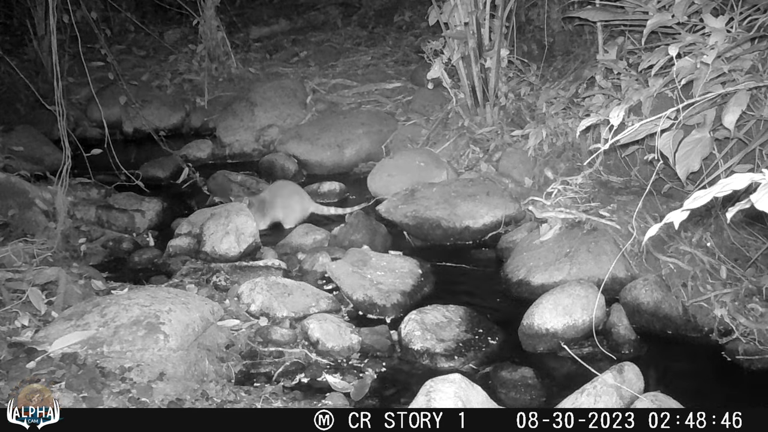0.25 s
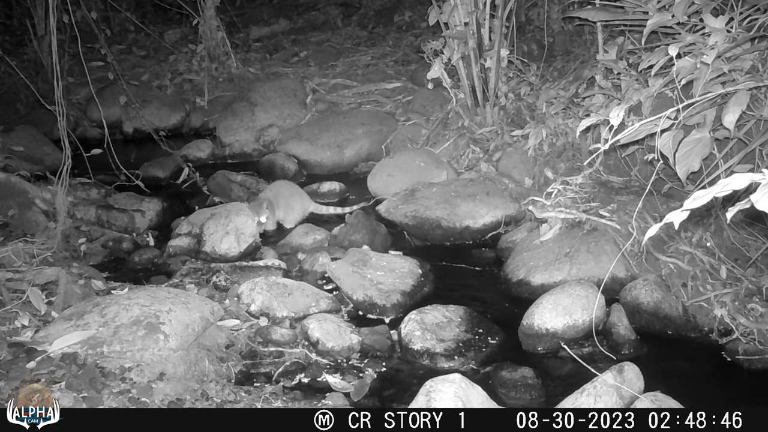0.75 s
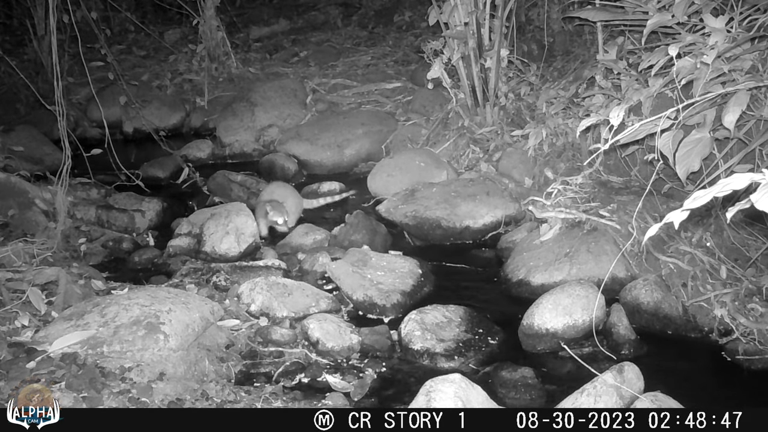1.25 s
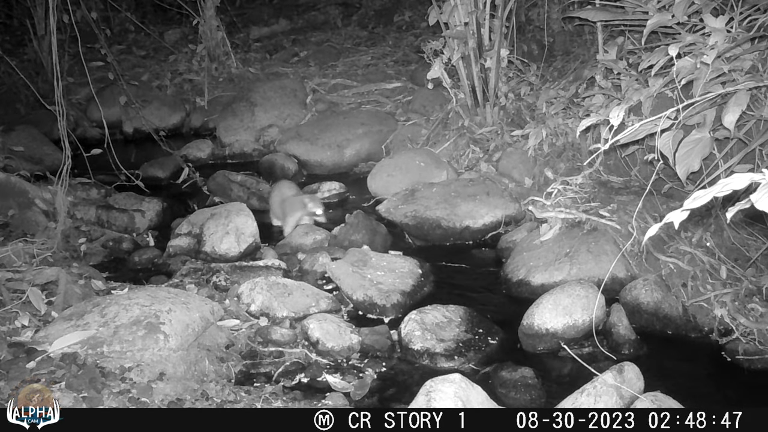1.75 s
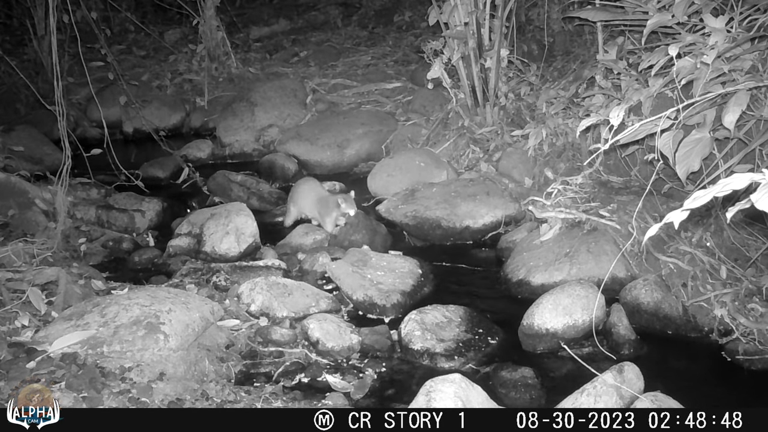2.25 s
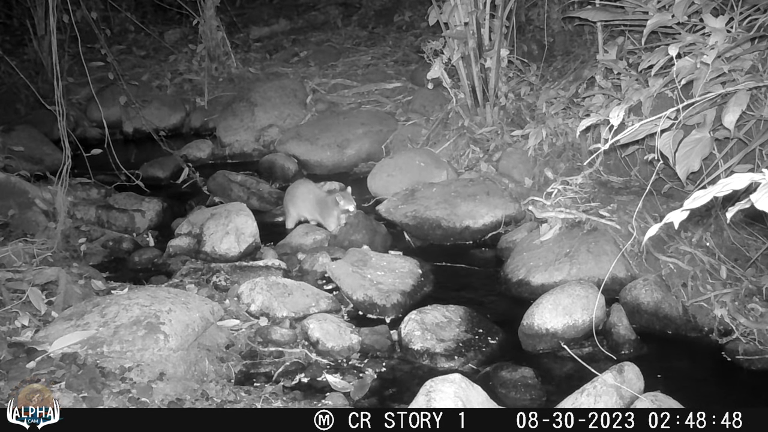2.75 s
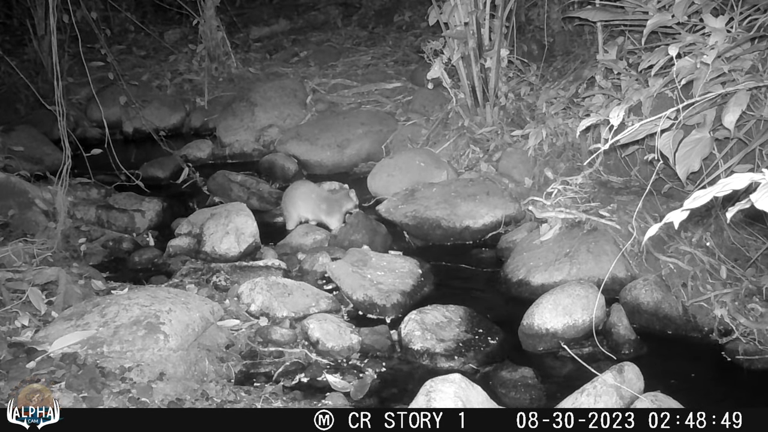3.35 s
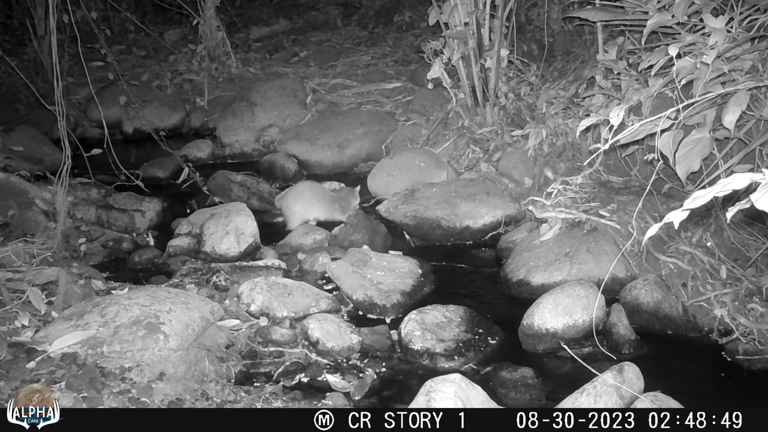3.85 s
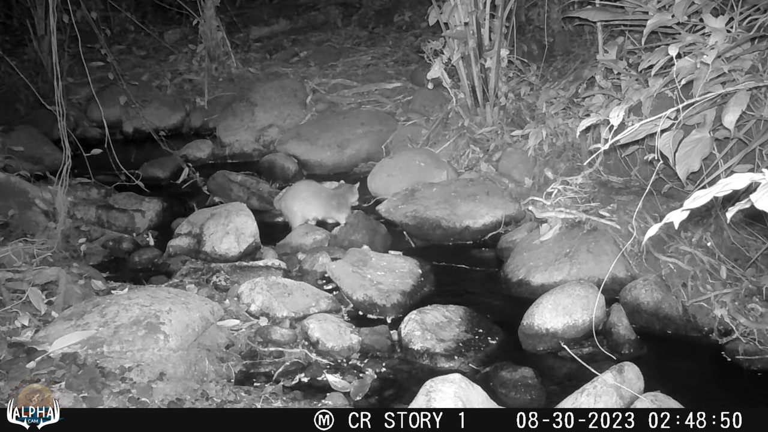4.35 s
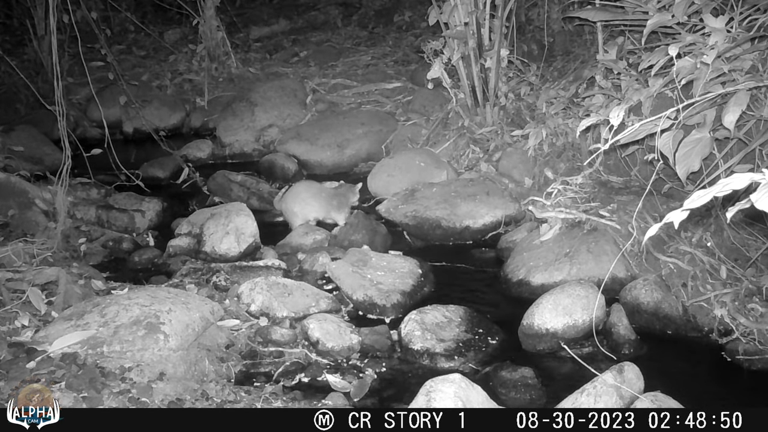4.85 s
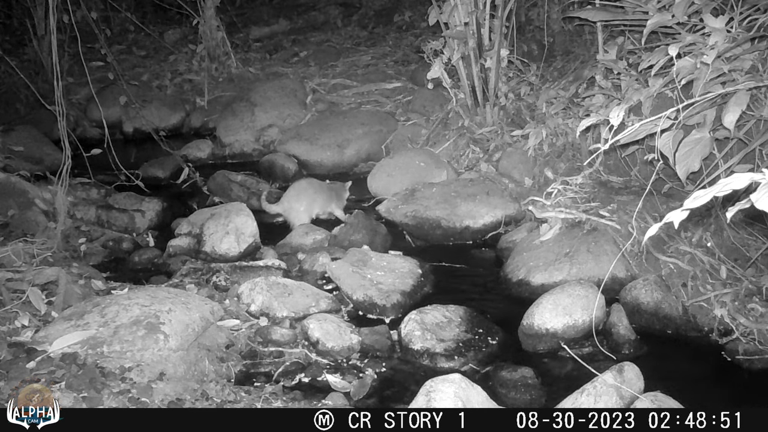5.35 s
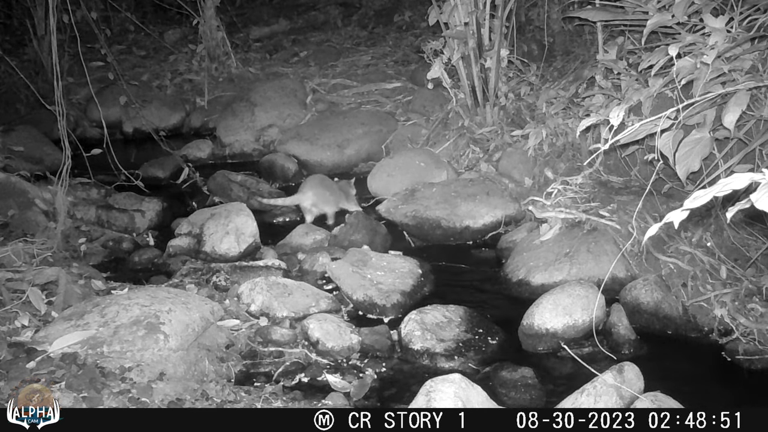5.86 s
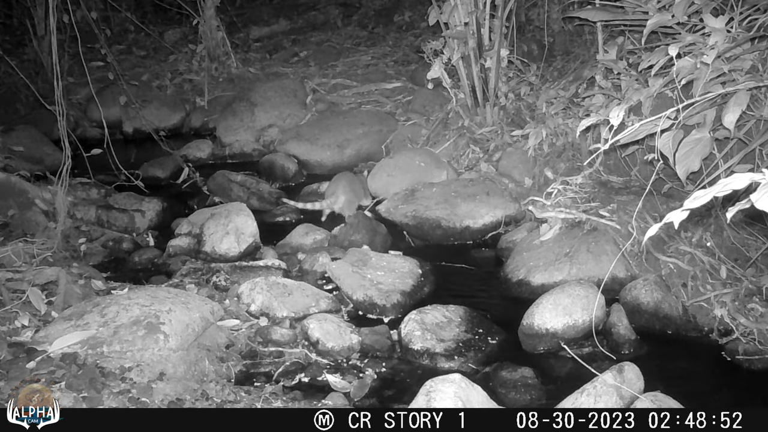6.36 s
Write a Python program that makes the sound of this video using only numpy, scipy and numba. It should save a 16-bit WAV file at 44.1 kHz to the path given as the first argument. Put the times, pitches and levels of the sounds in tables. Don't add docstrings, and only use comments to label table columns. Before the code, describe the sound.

Outdoors by a night brook, a small cheap camera microphone catches quiet trickling water, faint hum and hiss. The sound mutes almost at once, then climbs back in a rapid regular series of low thumps over about one second. Water then runs on unevenly, with isolated drips and rounded bubble plops, while katydids rasp in a high thin drone and crickets trill and buzz in short faint calls.

```python
import sys
import numpy as np
from scipy import signal
from scipy.fft import rfft, irfft
from scipy.io import wavfile
from scipy.ndimage import uniform_filter1d
from numba import njit

SR = 44100
rng = np.random.default_rng(int(sys.argv[2]) if len(sys.argv) > 2 else 0)


def voltage_ratio(level):
    return 10 ** (np.asarray(level, float) / 20)


def materialize(psi):
    bounded = np.clip(np.atleast_2d(psi).T, -1, 1)
    quanta = np.round(bounded * 32767).astype(np.int16)
    wavfile.write(sys.argv[1], SR, quanta)


N = 291501

# t/s, level/dB
SURGES = [(0.0, 1.5), (0.259, 2.5), (1.22, 6), (1.439, 5), (1.56, 1.5), (1.84, 3.5), (2.45, 0), (3.08, 1.5),
          (3.19, 3.5), (4.29, -0.5), (5.05, 2), (5.2, 1), (5.36, 0), (6.29, 0.5), (6.4, 1.5), (6.55, -0.5)]
# f/Hz, level/dB
HOLLOWS = [(450, -6), (1100, -2.5), (1500, -0.5), (2100, -2.5), (2800, -3.5)]
# f/Hz, density/dB per Hz
WASH_SPECTRUM = [(100, -28.5), (170, -2), (399, -12), (469, -1), (759, -2), (1590, -1.5), (2800, -7.5),
                 (3980, -18), (4910, -20.5), (5240, -28), (6780, -16), (7340, -15), (7960, -21.5),
                 (10300, -39), (17500, -120)]
# multiple/1, level/dB rms
HUM_LINES = [(1, -63), (3, -75), (4, -75), (5, -74), (6, -61), (8, -82), (9, -76), (11, -84), (12, -71),
             (15, -79), (16, -84), (21, -86), (24, -74), (27, -82), (30, -78), (33, -86), (36, -86),
             (42, -80), (48, -86), (51, -84), (54, -84), (60, -82), (72, -83)]
# f/Hz, width/Hz, level/dB
CHORUS_MODES = [(6740, 150, -2), (6820, 300, -2)]
# f/Hz, width/Hz, level/dB
DRONE_MODES = [(6456, 1000, -79), (7690, 490, -86)]
# t/s, length/s, level/dB
SOLOS = [(0.01, 0.042, -81.5), (.22, 0.12, -78.5), (1.862, 0.06, -81), (2.28, 0.055, -88),
         (2.45, 0.057, -83), (3.036, 0.068, -82), (4.13, 0.09, -78), (4.496, 0.21, -86),
         (5.006, 0.038, -88), (5.166, 0.065, -80.5), (5.427, 0.027, -85), (5.6, 0.087, -82),
         (5.773, 0.033, -83), (6.488, .14, -78)]
# t/s, length/s, level/dB
TRILLS = [(0.205, 0.081, -84.5), (1.49, 0.11, -80), (2.245, .09, -83), (2.373, 0.18, -82), (3.03, .08, -81),
          (3.17, .08, -94), (3.754, 0.21, -83.5), (4.64, .08, -83), (5.5, 0.099, -84), (5.67, .06, -90),
          (6.313, 0.085, -80), (6.46, 0.058, -86)]
# t/s, level/dB
BUZZES = [(.22, -85), (1.33, -87), (1.56, -87), (1.94, -84), (2.39, -82.5), (2.82, -88.5), (3.18, -83),
          (3.55, -87.5), (3.93, -84), (4.36, -92), (4.82, -89), (5.13, -87), (5.56, -88), (5.92, -91),
          (6.26, -85)]
# f/Hz, level/dB
BUZZ_LINES = [(4215, -5), (4385, -6), (4609, 0), (4787, -1), (4815, -1), (4996, -7)]
# f/Hz, width/Hz, level/dB
FAR_MODES = [(4943, 6, -100), (6368, 24, -90), (7694, 45, -93)]
# t/s, peak level/dB, f/Hz
DRIPS = [(0.248, -58, 1800), (1.871, -62, 2721), (2.657, -61, 2870), (2.744, -61, 1060), (2.999, -60, 2700),
         (3.0072, -55, 2153), (3.004, -69, 3120), (3.4419, -62.5, 3060), (3.1848, -59, 2210),
         (3.1985, -59, 3050), (3.198, -59, 1530), (3.493, -63, 1570), (3.554, -57, 1560),
         (4.037, -61, 2710), (4.408, -55, 2390), (4.4072, -50.5, 2970), (4.5, -55, 2800),
         (4.6636, -59, 2080), (4.699, -61, 1090), (4.851, -61.5, 2920), (5.223, -64, 2630),
         (5.6132, -66, 3350), (5.716, -58, 1920), (5.7432, -53.5, 1015), (5.925, -60, 2360),
         (6.297, -62, 950), (6.4023, -57.5, 2340), (6.4062, -59.5, 800), (6.528, -62, 2190)]
# t/s, peak level/dB, f/Hz, length/ms
PLOPS = [(1.6095, -58.5, 1640, 9.3), (1.7153, -58.5, 1620, 6.5), (1.8085, -58.5, 600, 14.3),
         (1.8511, -60, 810, 9.2), (1.893, -55.5, 1140, 7.2), (2.3428, -56, 1540, 7),
         (2.4847, -54, 546, 5.2), (2.5056, -60.5, 940, 11), (2.8797, -59.5, 1590, 6.4),
         (3.202, -64, 1110, 10.3), (3.354, -62, 1363, 13), (3.8054, -66, 630, 15), (4.1348, -58.5, 532, 12),
         (4.3006, -60, 422, 29), (4.303, -58, 1520, 3.9), (4.312, -60.5, 1157, 12),
         (4.461, -54.5, 1046, 11.6), (5.0736, -56, 296, 39), (5.139, -55, 980, 5),
         (5.3515, -54.5, 520, 13.5), (5.375, -57.5, 570, 11), (5.85, -61, 1350, 11),
         (6.4431, -64, 1190, 6.7), (1.9315, -61, 1290, 5), (5.205, -68, 705, 8.4), (6.2175, -58, 1380, 5.6),
         (6.236, -60, 1010, 6.9), (6.2963, -57.9, 1620, 6.8), (6.5762, -56, 498, 8)]
GAIN_STEPS_S = [
    .7905,
    .8906,
    .9962,
    1.0907,
    1.1906,
    1.2908,
    1.3905,
    1.4907,
    1.5905,
    1.6905,
]


def level(x, db):
    return x * voltage_ratio(db) / np.sqrt(np.mean(x ** 2))


def walk(rate_hz):
    hold = int(SR / rate_hz)
    steps = np.repeat(rng.standard_normal(N // hold + 1), hold)
    return 1.8 * uniform_filter1d(uniform_filter1d(steps, hold), hold)[:N]


def calls(start_s, hold_s, gain, attack_s, release_s):
    t = np.arange(N) / SR
    total = np.zeros(N)
    for s, hold, g in np.broadcast(start_s, hold_s, gain):
        rise = np.clip((t - s) / attack_s + 1, 0, 1)
        total += g * rise * np.exp(-np.clip(t - s - hold, 0, None) / release_s)
    return total


@njit
def bubbles(start, hz, cycles, size, glide):
    out = np.zeros(N)
    for k in range(len(start)):
        span = cycles[k] * SR / hz[k]
        phase = 0.
        for i in range(min(int(4 * span), N - start[k])):
            u = i / span
            phase += 2 * np.pi * hz[k] * (1 + glide[k] * (u - .5)) / SR
            swell = 2 * np.e * u * np.exp(-2 * u)
            out[start[k] + i] += size[k] * np.sin(phase) * swell
    return out


def trickle(count=6000, spill_count=260):
    place, pitch, loudness, ring, rise, group = rng.random((count, 6)).T
    group = group * spill_count
    spill_start = rng.random(spill_count)[group.astype(int)]
    in_spill = spill_start + place * .012 * SR / N
    when = np.where(group % 1 < .35, in_spill, place) % 1
    octaves = 4.4 * pitch
    faint_db = 9 * np.clip(octaves - 2.9, 0, None) ** 1.5 + 9 * np.clip(1 - octaves, 0, None)
    size = voltage_ratio(np.minimum(-3.6 * np.log(loudness), 13) - faint_db)
    return bubbles((when * N).astype(np.int64), 212 * 2 ** octaves, 3 + 7 * ring, size, .1 * rise)


def gurgle(count=700):
    when, hollow, loudness, detune, ring = rng.random((count, 5)).T
    hz, db = np.array(HOLLOWS)[(hollow * len(HOLLOWS)).astype(int)].T
    size = voltage_ratio(db + np.minimum(-3 * np.log(loudness), 7))
    hz = hz * 2 ** (.5 * detune - .25)
    return bubbles((when * N).astype(np.int64), hz, 2.5 + 6 * ring, size, .06 * ring)


def wash(flicker_db=0.5):
    hz = np.fft.rfftfreq(N, 1 / SR) + 1
    spectrum_hz, spectrum_db = np.transpose(WASH_SPECTRUM)
    colour = voltage_ratio(np.interp(np.log(hz), np.log(spectrum_hz), spectrum_db))
    noise = rfft(rng.standard_normal(N)) * colour
    out = np.zeros(N)
    for centre in range(44):
        share = np.clip(1 - abs(3 * np.log2(hz) - centre), 0, 1)
        out += irfft(noise * share, N) * voltage_ratio(flicker_db * walk(16))
    return out


def hum(clock_hz=4.988, peak_s=3.315):
    phase = 2 * np.pi * clock_hz * (np.arange(N) / SR - peak_s)
    scatter = np.minimum(np.array(HUM_LINES)[:, 0] / 25, 1)
    lag = rng.uniform(-np.pi, np.pi, len(HUM_LINES)) * scatter
    lines = np.zeros(N)
    for (multiple, db), a in zip(HUM_LINES, lag):
        lines += voltage_ratio(db + .7 * walk(4)) * np.cos(multiple * phase + a)
    hz = np.fft.rfftfreq(N, 1 / SR)
    slope = (hz + 4) ** -.75 / (1 + (hz / 1500) ** 2)
    flicker = level(irfft(rfft(rng.standard_normal(N)) * slope, N), -62.5)
    return np.sqrt(2) * lines + flicker


def resonance(x, hz, width_hz):
    edges_hz = [hz - width_hz / 2, min(hz + width_hz / 2, .45 * SR)]
    sos = signal.butter(1, edges_hz, "band", fs=SR, output="sos")
    return signal.sosfilt(np.vstack([sos, sos]), x)


def rasp(modes, rough_db):
    ticks = rng.standard_normal(N) * voltage_ratio(rough_db * walk(70))
    return sum(level(resonance(ticks, hz, width_hz), db) for hz, width_hz, db in modes)


def katydids():
    start_s, hold_s, db = np.transpose(SOLOS)
    solos = calls(start_s, hold_s, voltage_ratio(db), attack_s=0.01, release_s=0.025)
    chorus = voltage_ratio(-79 - 1.6 * walk(6)) + solos
    return chorus * rasp(CHORUS_MODES, rough_db=-0.5) + rasp(DRONE_MODES, rough_db=1.0)


def trilling_cricket():
    start_s, hold_s, db = np.transpose(TRILLS)
    trill = voltage_ratio(-103) + calls(start_s, hold_s, voltage_ratio(db), attack_s=0.01, release_s=0.047)
    stroke_hz = 40 * (1 + .12 * walk(12))
    strokes = 1 + .55 * np.cos(2 * np.pi * np.cumsum(stroke_hz) / SR)
    unevenness = voltage_ratio(1.5 * walk(40))
    tone = np.sin(2 * np.pi * np.cumsum(5604 + 14 * walk(45)) / SR)
    return voltage_ratio(-3.5) * trill * strokes * unevenness * tone


def buzzing_cricket():
    start_s, db = np.transpose(BUZZES)
    call = voltage_ratio(-97) + calls(start_s, 0.1, voltage_ratio(db), attack_s=0.044, release_s=.08)
    buzz = sum(level(resonance(rng.standard_normal(N), hz, 15), db) for hz, db in BUZZ_LINES)
    return voltage_ratio(-9.0) * call * buzz


def plops(drip_cycles=6.1):
    drips = [(s, db, hz, 1000 * drip_cycles / hz) for s, db, hz in DRIPS]
    peak_s, db, hz, length_ms = np.transpose(PLOPS + drips).astype(float)
    span_s = length_ms / 1220
    start = ((peak_s - .116 * span_s) * SR).astype(np.int64)
    return bubbles(start, hz, span_s * hz, voltage_ratio(db), np.full(len(hz), .03))


def scene():
    start_s, db = np.transpose(SURGES)
    surge_db = calls(start_s, 0.053, db, attack_s=0.01, release_s=0.013)
    swell = voltage_ratio(surge_db + 0.82 * walk(20))
    near_water = swell * (level(trickle(), -68.5) + level(gurgle(), -74.5))
    far_water = level(wash(), -67.5) * swell ** 0.68
    brook = near_water + far_water + plops()
    crickets = trilling_cricket() + buzzing_cricket() + rasp(FAR_MODES, rough_db=-1.0)
    return (brook + katydids() + crickets)[None]


def band_limit(x):
    return signal.sosfilt(signal.butter(12, 8110, fs=SR, output="sos"), x)


def record(dry):
    mute_s, fade_s, slew_samples = .3072, .003, 10
    offset_fs, drain_s, drain_late_s = -.141, .55, .9
    t = np.arange(N) / SR
    gain = np.clip((mute_s - t) / fade_s, 0, 1) + np.searchsorted(GAIN_STEPS_S, t) / len(GAIN_STEPS_S)
    gain = .42 * gain + .58 * uniform_filter1d(gain, slew_samples)
    since_s = np.clip(t - GAIN_STEPS_S[0], 0, None)
    drain = np.exp(-since_s / drain_s - (since_s / drain_late_s) ** 2)
    offset = (t > 2 * mute_s) * offset_fs * drain
    heard = gain * (dry + hum() + offset)
    lowpass = signal.ellip(6, .1, 40, 7860, fs=SR, output="sos")
    mix = signal.sosfiltfilt(lowpass, heard)
    return band_limit(mix)


dry = scene()
out = record(dry)
materialize(out)
```